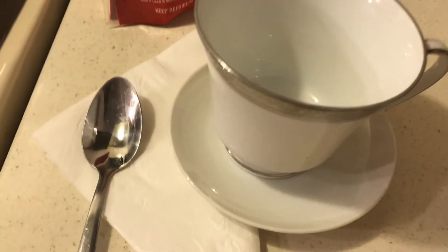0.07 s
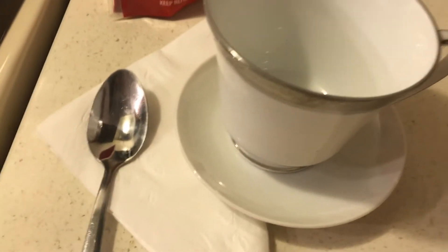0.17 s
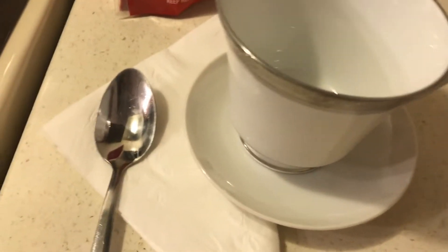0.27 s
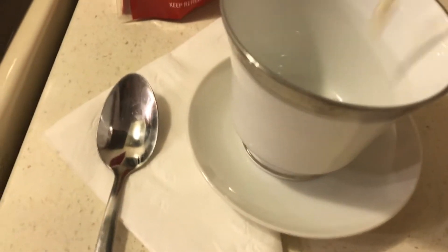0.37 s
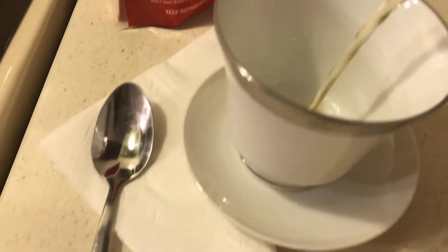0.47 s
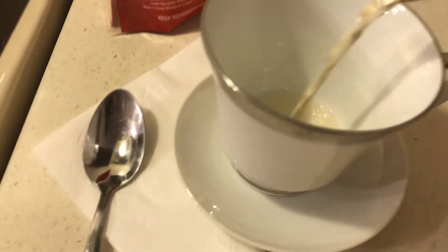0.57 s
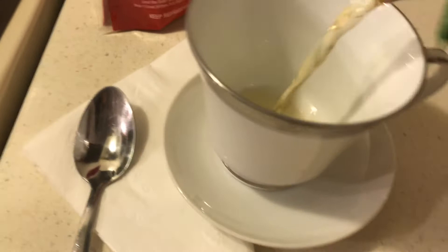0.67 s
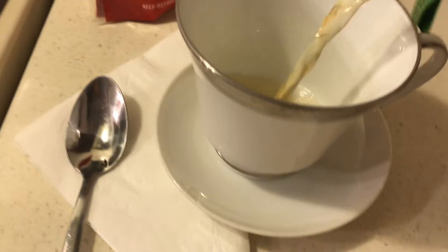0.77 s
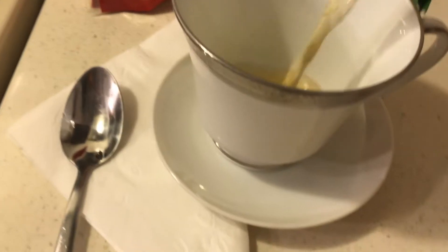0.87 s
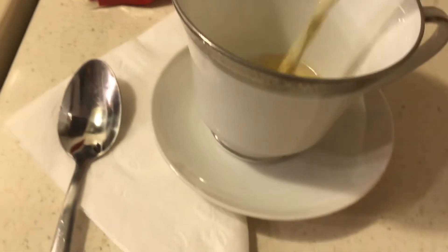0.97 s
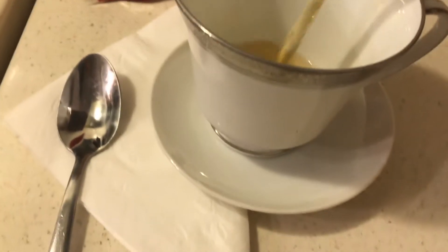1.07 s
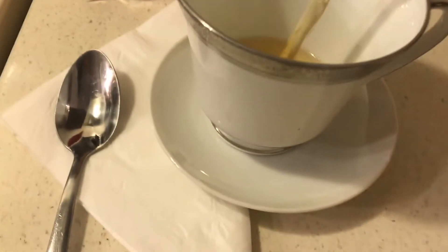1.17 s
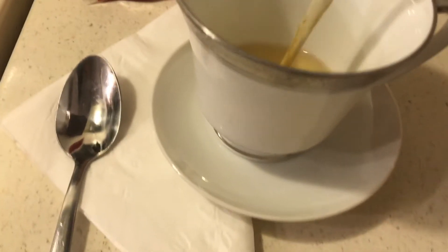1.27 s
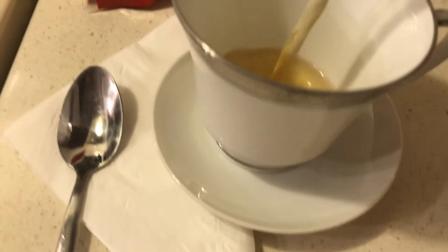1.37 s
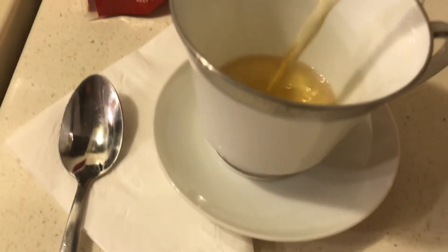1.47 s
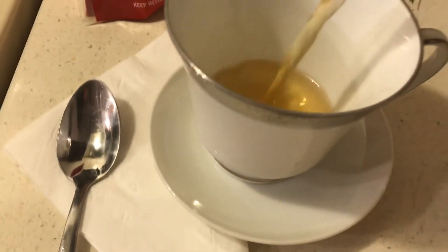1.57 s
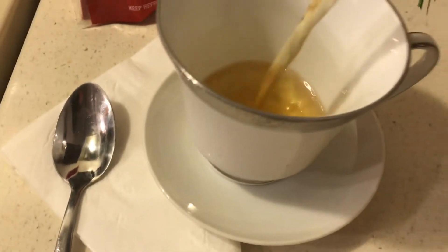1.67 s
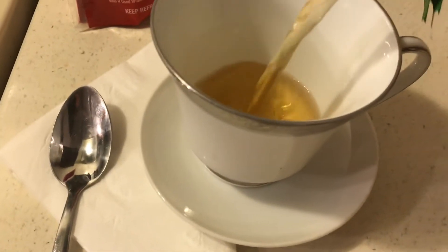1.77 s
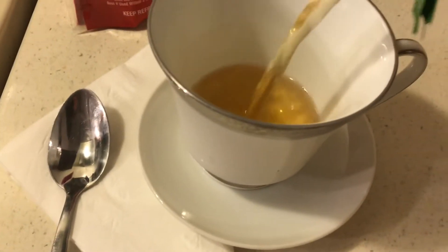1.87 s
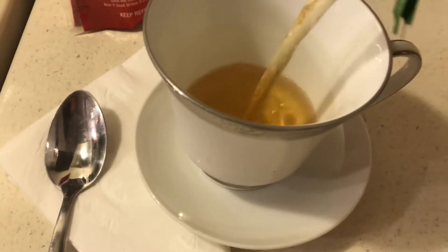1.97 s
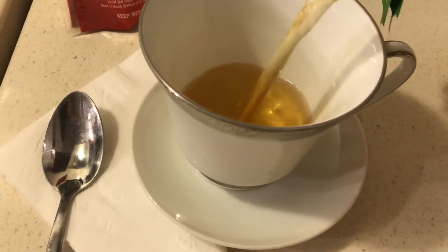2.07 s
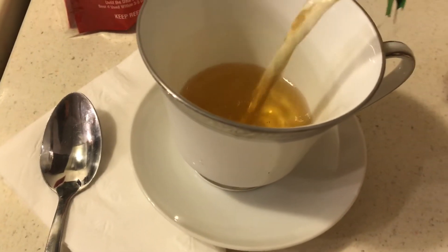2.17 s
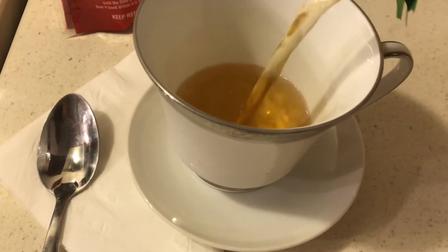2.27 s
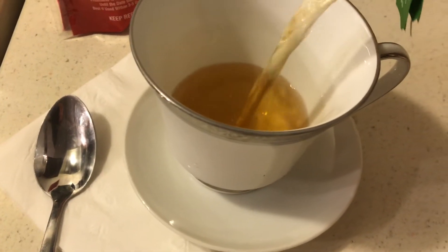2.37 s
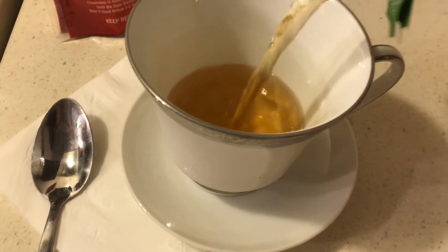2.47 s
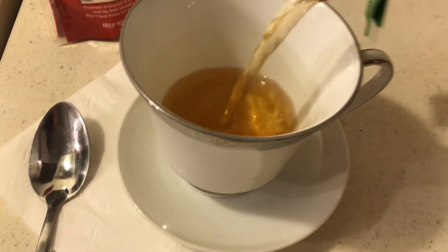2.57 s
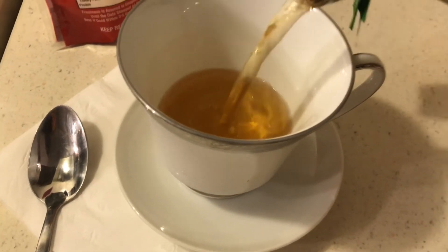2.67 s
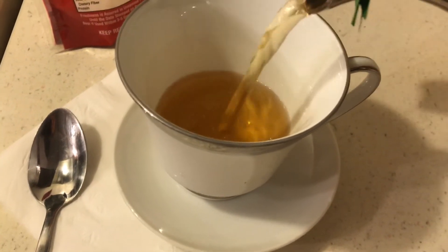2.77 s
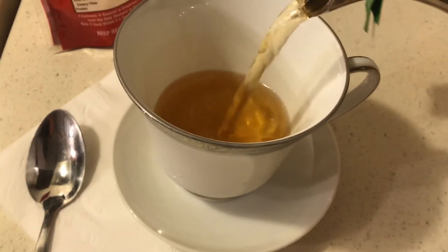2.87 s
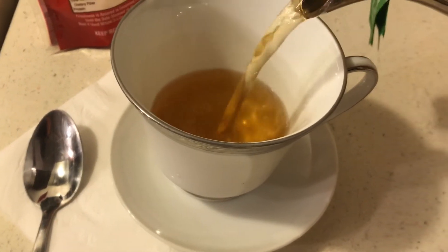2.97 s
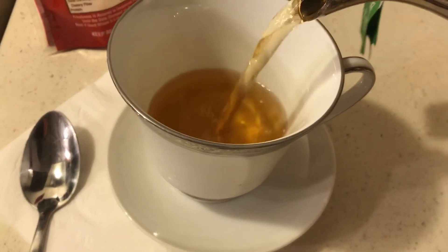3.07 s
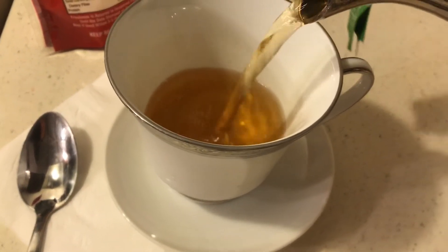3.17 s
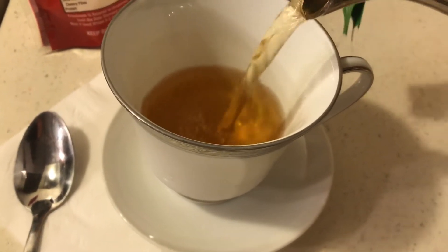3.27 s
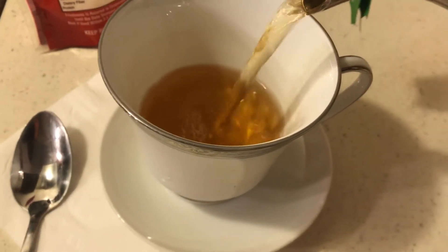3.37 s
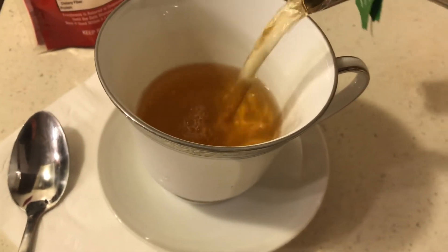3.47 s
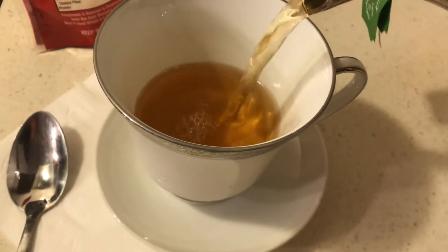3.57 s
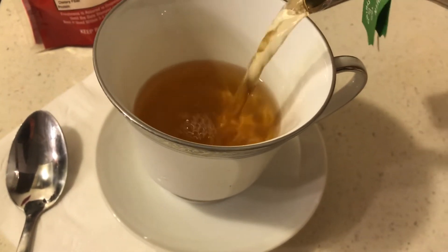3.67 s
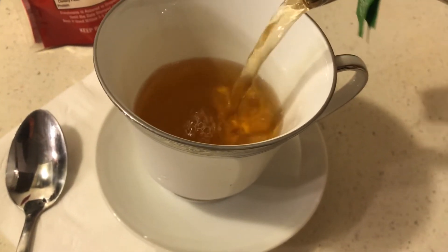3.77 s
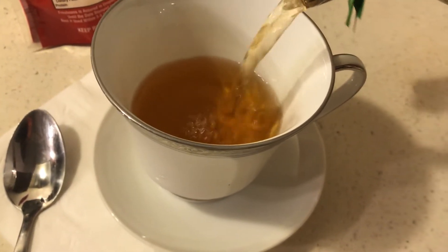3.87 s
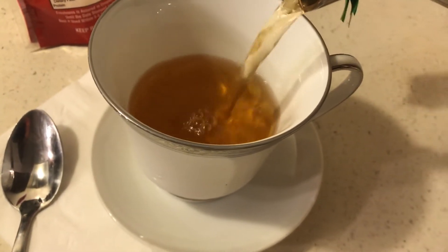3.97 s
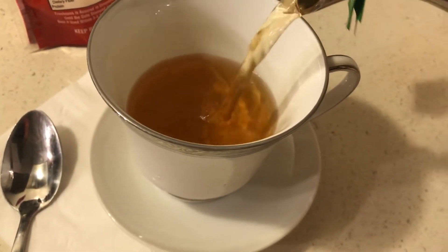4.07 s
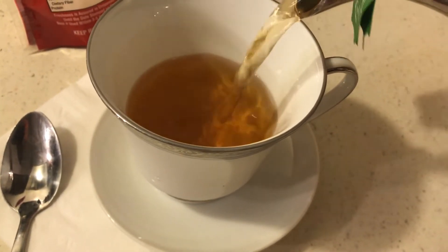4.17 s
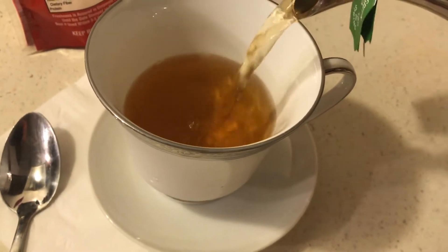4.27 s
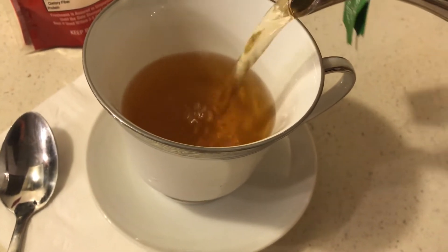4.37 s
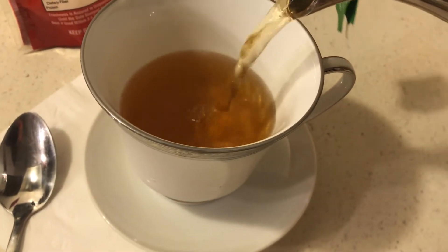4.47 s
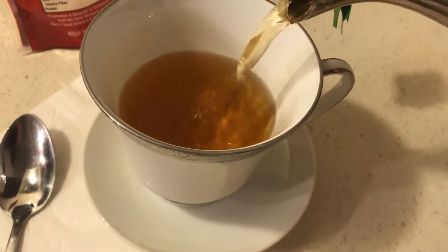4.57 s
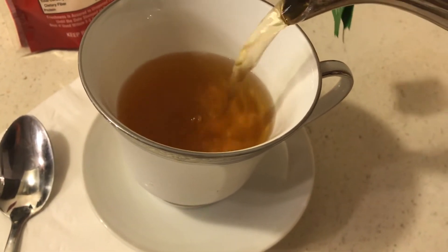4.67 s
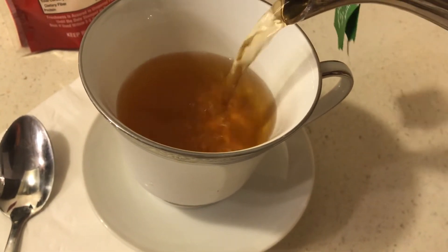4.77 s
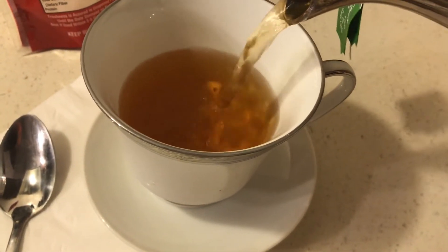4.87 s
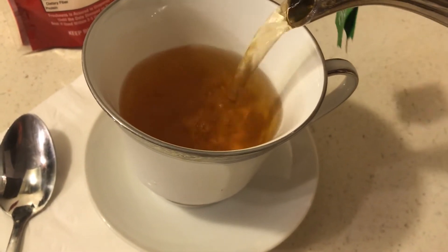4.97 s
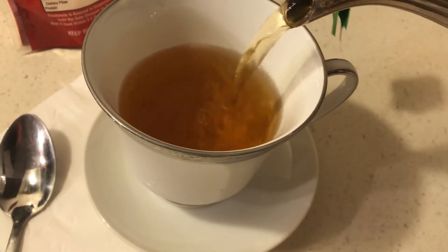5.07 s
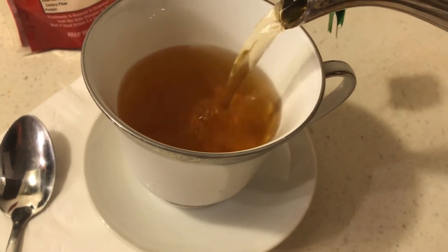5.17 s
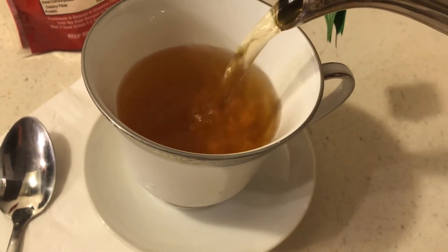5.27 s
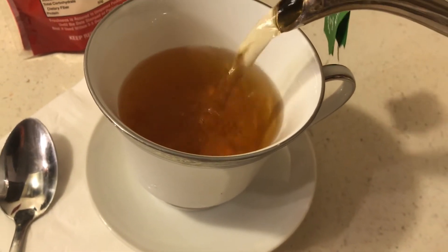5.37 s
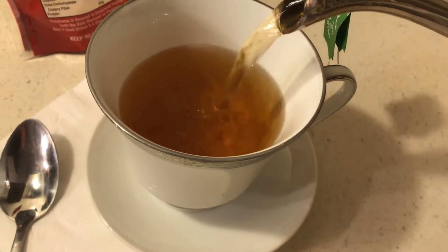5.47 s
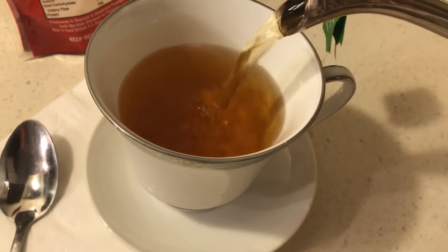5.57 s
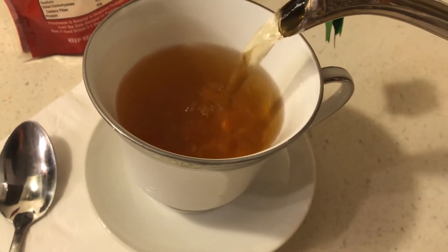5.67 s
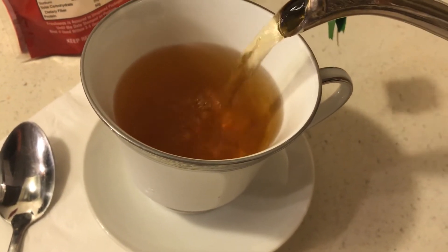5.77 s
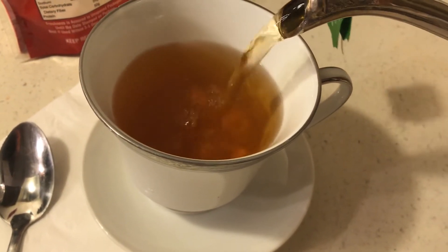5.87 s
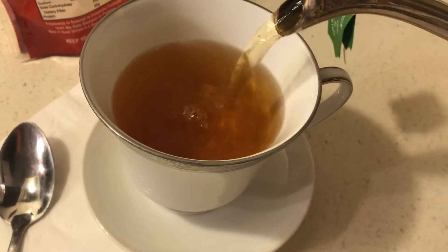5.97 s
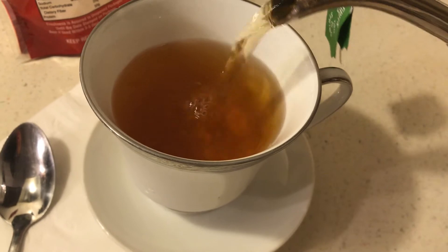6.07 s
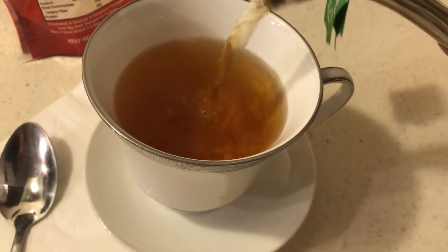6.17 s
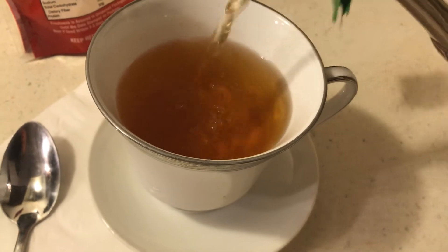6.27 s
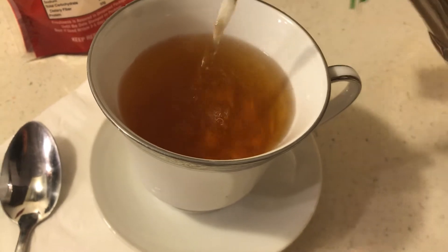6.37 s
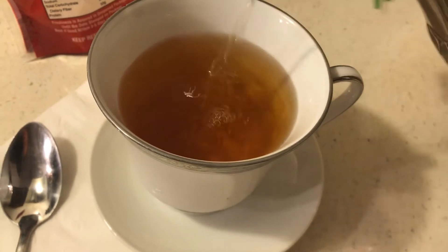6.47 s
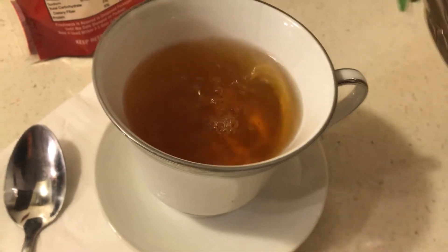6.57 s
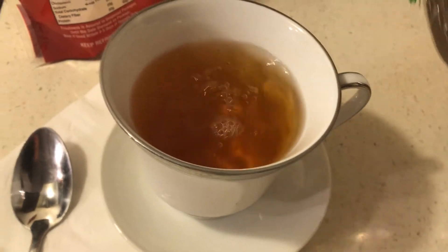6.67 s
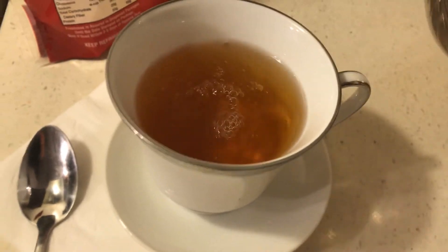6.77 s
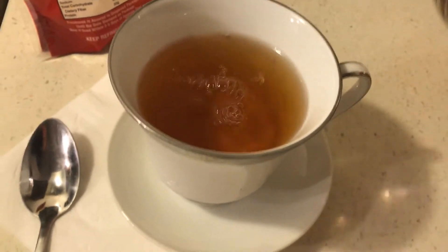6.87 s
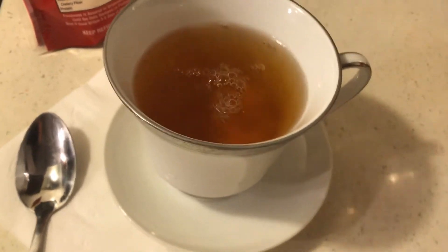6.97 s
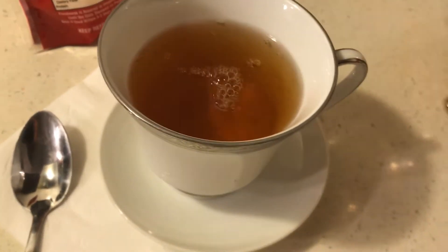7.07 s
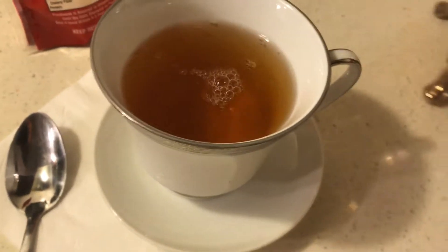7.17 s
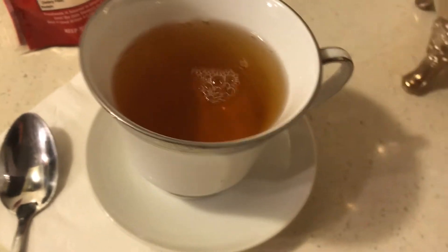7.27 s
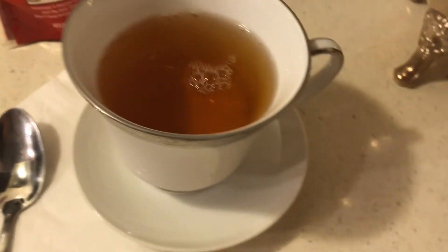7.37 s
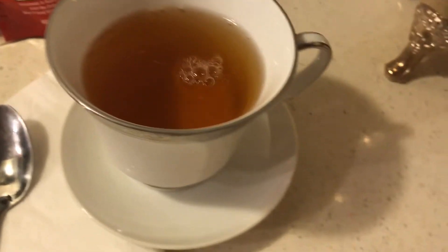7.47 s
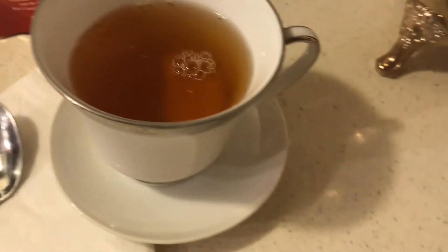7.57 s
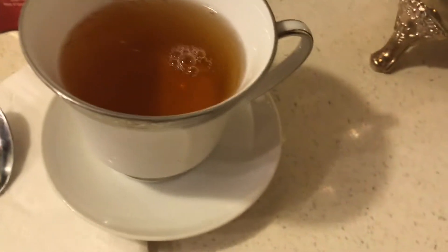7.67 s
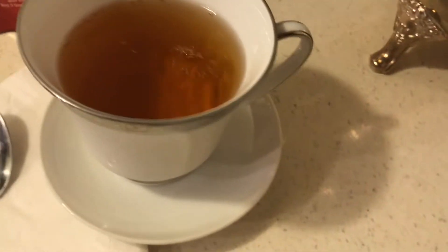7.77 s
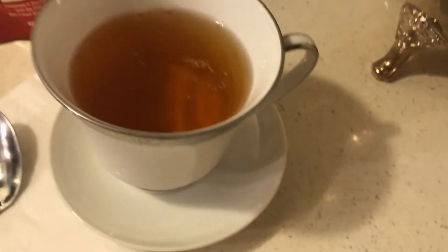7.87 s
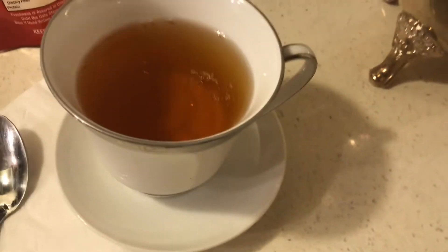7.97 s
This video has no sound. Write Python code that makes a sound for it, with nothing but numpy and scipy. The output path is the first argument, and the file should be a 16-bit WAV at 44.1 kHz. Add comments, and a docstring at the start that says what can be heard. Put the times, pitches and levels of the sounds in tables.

```python
"""In a small kitchen, tea runs in a thin, smooth stream from a metal teapot into a china cup.
Trapped bubbles plink as decaying sines of rising pitch; droplets tick as short noise bursts that ring the china.
The last drips fall, then the pot is set down foot by foot: damped modes of the counter thud, while
random blows on the loose lid excite the modes of the metal. An appliance hums under steady air noise;
a brief low tone dies away at the start and a light scrape swells at the end."""
import sys
import numpy as np
from scipy import signal
from scipy.fft import rfft, irfft, next_fast_len
from scipy.io import wavfile
from scipy.ndimage import map_coordinates

SR = 44100
rng = np.random.default_rng(int(sys.argv[2]) if len(sys.argv) > 2 else 0)


def master(y):
    """Save y as 16-bit WAV."""
    cut = np.clip(np.atleast_2d(y).T, -1, 1)
    pcm = np.round(cut * 32767)  # scale
    wavfile.write(sys.argv[1], SR, pcm.astype(np.int16))


N = 353329  # length in samples
TOP_HZ = 15780  # upper band limit


def amp(db):
    """Decibels express amplitude as a logarithmic ratio."""
    return 10 ** (np.asarray(db) / 20)


def unit(x):
    """Normalisation to an rms of 1 equalises mean power."""
    return x / np.sqrt(np.mean(x ** 2) + 1e-20)


def seconds(length):
    """Uniform sampling gives a time axis of this length in seconds."""
    return np.arange(int(length * SR)) / SR


def fade(t, t60):
    """Exponential damping: amplitude falls 60 dB in t60."""
    return np.exp(-np.log(1000) * t / t60)


def along(points, hz):
    """Interpolation of (Hz, value) points on a logarithmic frequency axis."""
    f, value = np.transpose(points)
    return np.interp(np.log(hz + 1), np.log(f + 1), value)


def wobble(rate):
    """Slow random modulation: a smooth curve through rate random knots a second."""
    knots = rng.standard_normal(int(N * rate / SR) + 4)
    return map_coordinates(knots, [np.arange(N) * rate / SR])


def filtered(x, response):
    """Linear filtering: the spectrum is multiplied by a response of frequency."""
    size = next_fast_len(len(x) + SR // 4)
    hz = np.fft.rfftfreq(size, 1 / SR)
    return irfft(rfft(x, size) * response(hz), size)[:len(x)]


def noise(spectrum, size):
    """Spectral shaping: white noise coloured by (Hz, dB) points, with an rms of 1."""
    return unit(filtered(rng.standard_normal(size), lambda hz: amp(along(spectrum, hz))))


def add(track, s, sound):
    """Superposition: a sound is summed into the track at time s."""
    part = track[max(0, round(s * SR)):][:len(sound)]
    part += sound[:len(part)]


# Steady air noise of the kitchen. Each row: frequency in Hz, relative level in dB.
AIR_SPECTRUM = [(25, -25), (45, -14), (65, -5.5), (110, -7), (175, -6.5), (220, -19), (300, -14.5),
                (500, -20), (800, -20.5), (1000, -18.5), (2000, -26), (2900, -34.5), (5000, -33),
                (13000, -36.5), (16000, -40)]
# Tones of the appliance motor. Each row: frequency in Hz, middle rms level in dB.
MOTOR_TONES = [(119, -51.5), (294, -64.5), (418, -70.5), (620, -70)]


def kitchen():
    """Broadband noise and modulated tones: steady air under an appliance hum wavering in level and phase."""
    t = np.arange(N) / SR
    hum = np.zeros(N)
    for hz, db in MOTOR_TONES:
        level = amp(db + 2.4 * wobble(13)) * np.sqrt(2)  # rms to peak
        hum += level * np.sin(2 * np.pi * hz * t + 1.59 * wobble(7.3))
    return hum + amp(-50) * noise(AIR_SPECTRUM, N)


def opening_tone():
    """Free decay: a brief low tone dies away under a longer sheen of coloured noise."""
    out, t = np.zeros(N), seconds(0.29)
    tone = amp(-24.0) * np.sin(2 * np.pi * 390 * t) * fade(t, 0.082)
    spectrum = [(2300, -14.5), (2850, -3.5), (3000, -3.5), (3400, -21), (6000, -14), (9000, -28)]
    sheen = amp(-43.5) * noise(spectrum, len(t)) * fade(t, 0.18)
    add(out, 0, tone + sheen)
    return out


START_S, FULL_S, STOP_S = 1.1, 1.74, 6.6  # the stream starts to bubble, bubbles fully, stops
BUILD_DB, CALM_DB_PER_S = 6.5, 1.26  # bubbling builds with the pool, then calms as the fall shortens


def stream_db(s):
    """Impact strength governs bubbling: a quick build, then a slow calming as the cup fills."""
    calmed_db = -CALM_DB_PER_S * (STOP_S - FULL_S)
    return np.interp(s, [START_S, FULL_S, STOP_S], [-BUILD_DB, 0, calmed_db])


# A shallow pool traps only small bubbles: time when it is deep enough, lowest pitch before and after
DEEP_S, SHALLOW_HZ, DEEP_HZ = 1.9, 2740, 1214
SMALLER_DB_PER_OCTAVE = 1  # smaller bubbles are higher and weaker


def scatter(count, octaves, spread_db):
    """Random entrainment: rows (s, dB, Hz) of mostly large bubbles that thin out as the cup fills."""
    when, size, strength = rng.random(size=(count, 3)).T
    s = START_S + (STOP_S - START_S) * (when + when ** 3) / 2
    up = octaves * size ** 1.384
    db = stream_db(s) - spread_db * np.log(strength + .03) - SMALLER_DB_PER_OCTAVE * up
    lowest_hz = np.where(s < DEEP_S, SHALLOW_HZ, DEEP_HZ)
    return zip(s, db, lowest_hz * 2 ** up)


def plink(hz, cycles, swell, rise):
    """Bubble resonance: it swells, rings down 60 dB in some cycles and rises in pitch near the surface."""
    t = seconds(.06)
    age = t * hz  # in cycles, as is swell
    tone = np.sin(2 * np.pi * age * (1 + rise * age / cycles))
    ring = tone * fade(age, cycles) * (1 - np.exp(-age / swell))
    return ring / np.abs(ring).max()


def bubble(hz):
    """Pinch-off excites resonance: a plink with a small wet splat around the bubble's own pitch."""
    t = seconds(.06)
    spectrum = [(.5 * hz, -25), (hz, 0), (1.5 * hz, -4), (2.5 * hz, -14), (5 * hz, -28)]
    splat = noise(spectrum, len(t)) * fade(t, .04)
    return plink(hz, cycles=47.4, swell=1.16, rise=0.027) + amp(-15.5) * splat


# Spectrum of a droplet's snap. Each row: frequency in Hz, relative level in dB.
SNAP_SPECTRUM = [(1000, 0), (2500, 5), (4500, -0.5), (7000, 3), (10500, 2), (14000, 0), (16000, -18.5)]
# Faint ring of the china under a droplet. Each row: frequency in Hz, middle level in dB re the snap's
# peak, 60 dB decay time in seconds.
CHINA_MODES = [(2190, -34, 0.17), (4220, -21, 0.047)]


def tick():
    """Impulsive excitation: a droplet snaps and faintly rings the modes of the china."""
    t = seconds(.15)
    snap = noise(SNAP_SPECTRUM, len(t)) * (fade(t, 0.0026) + 0.17 * fade(t, 0.042))
    china = np.zeros(len(t))
    for hz, level, t60 in CHINA_MODES:
        china += amp(level + rng.normal(0, 4.3)) * np.sin(2 * np.pi * hz * t) * fade(t, t60)
    return snap / np.abs(snap).max() + china


# Loudest air bubbles trapped by the stream and the last drips. Each row: start in seconds,
# level in dB, pitch in Hz.
LOUD_BUBBLES = [(1.198, -38, 4730), (1.671, -45.5, 3450), (1.714, -41, 3730), (1.811, -38, 2280),
                (1.949, -36, 1510), (1.962, -27.0, 1340), (1.981, -34, 1350), (2.005, -31.5, 8900),
                (2.02, -27, 1395), (2.066, -31.5, 1450), (2.146, -35.5, 1266), (2.195, -30.5, 1320),
                (2.219, -26.5, 1240), (2.229, -29.0, 1217), (2.252, -26.5, 1310), (2.42, -36, 1363),
                (2.515, -38, 1400), (2.59, -39.5, 1003), (2.707, -32.5, 1530), (2.717, -31, 1330),
                (2.804, -39.5, 1380), (2.839, -35.5, 1564), (3.072, -44, 2420), (3.167, -39.0, 4540),
                (3.18, -42, 2270), (3.204, -36.0, 4900), (3.25, -42, 6400), (3.293, -43.5, 1830),
                (3.346, -40.5, 1790), (3.702, -41.5, 1335), (3.848, -44, 1640), (4.148, -38.5, 2240),
                (4.199, -43, 2430), (4.535, -41.0, 2070), (4.748, -48, 3480), (5.057, -36, 2050),
                (5.181, -39.5, 1750), (5.497, -44.5, 2230), (5.765, -44, 1870), (5.97, -43.5, 3200),
                (6.475, -31, 3320), (6.521, -34, 2970), (6.571, -37.5, 5400)]
# Loudest droplets snapping on the surface and the china. Each row: start in seconds, level in dB.
LOUD_TICKS = [(1.082, -38), (1.197, -37.0), (1.318, -30.5), (1.351, -38), (1.771, -33), (1.81, -28),
              (2.019, -33), (2.145, -37), (3.727, -31), (4.642, -39), (5.057, -32), (6.355, -37),
              (6.385, -36.5), (6.488, -34.5), (6.519, -31), (6.571, -34), (7.545, -34)]
FIZZ_DB, SPRAY_DB = -52, -40.5  # tiny bubbles and stray droplets, before their random spread
# Shed bubbles: within this time, over this range of pitch, the share of it below the parent's pitch
SHED_S, SHED_OCTAVES, SHED_BELOW = .035, 1.19, 0.296
SHED_DB, SHED_FOLLOWS = -49.5, 0.35  # level under a mean parent, dB followed per dB of the parent


def pour():
    """Superposed bubble acoustics: loud plinks shed weaker ones; ticks, spray and fizz follow the stream."""
    tea = np.zeros(N)
    usual_db = np.mean([db for s, db, hz in LOUD_BUBBLES])
    for s, db, hz in LOUD_BUBBLES:
        add(tea, s, amp(db) * bubble(hz))
        for late, smaller in rng.random(size=(3, 2)):
            up = SHED_OCTAVES * (smaller - SHED_BELOW)
            shed_db = SHED_DB + SHED_FOLLOWS * (db - usual_db) - SMALLER_DB_PER_OCTAVE * up
            shed_hz = min(hz * 2 ** up, TOP_HZ)
            add(tea, s + SHED_S * late, amp(shed_db) * bubble(shed_hz))
    for s, db in LOUD_TICKS:
        add(tea, s, amp(db) * tick())
    for s, db, _ in scatter(count=14, octaves=0, spread_db=1.5):
        add(tea, s, amp(SPRAY_DB + db) * tick())
    for s, db, hz in scatter(count=480, octaves=2.49, spread_db=3.5):
        add(tea, s, amp(FIZZ_DB + db) * plink(hz, cycles=18, swell=.8, rise=.08))
    return tea


# Landings of the pot's feet. Each row: start in seconds, level in dB, hardness (level of the crack
# re the thump) in dB.
FOOT_LANDINGS = [(6.895, -1.5, -12.5), (6.9926, -13.5, -29), (7.028, -20.5, -34), (7.0997, -6.5, -14),
                 (7.346, -5.5, -10.5), (7.366, -7.5, -21)]
# Modes of the counter. Each row: frequency in Hz, relative level in dB, 60 dB decay time in seconds.
COUNTER_MODES = [(76.6, -12.5, 0.3), (117, 0.5, 0.087), (171, 3, 0.1), (228, -6, 0.083),
                 (315.6, -0.5, 0.065), (437, -8.5, 0.027), (634, -18, 0.076), (1033, -17, 0.096)]


def feet():
    """Modal excitation: each foot thumps the counter's modes; a harder landing has more dull crack."""
    thuds = np.zeros(N)
    t = seconds(.5)
    crack_spectrum = [(40, -35), (200, -17), (600, -8.5), (1500, -18), (5000, -24), (12000, -44)]
    onset = 1 - np.exp(-t / 0.00063)
    for s, db, hard_db in FOOT_LANDINGS:
        ring = np.zeros(len(t))
        for k, (hz, level, t60) in enumerate(COUNTER_MODES):
            sign = (-1) ** k  # neighbouring modes start in opposite phase
            ring += sign * amp(level + rng.normal()) * np.sin(2 * np.pi * hz * t) * fade(t, t60)
        thump = ring / np.abs(ring).max()
        crack = noise(crack_spectrum, len(t)) * fade(t, 0.14)
        add(thuds, s, amp(db) * (thump + amp(hard_db) * crack) * onset)
    return thuds


# Bouts of lid chatter. Each row: start in seconds, length in seconds, level in dB before
# scaling for the bout's length.
CHATTER_BOUTS = [(6.907, 0.024, -14), (7, 0.0063, -31.5), (7.105, 0.028, -17.5), (7.352, 0.018, -20.5),
                 (7.367, 0.025, -17)]
# Modes of the pot's metal shell and lid. Each row: frequency in Hz, relative level in dB,
# 60 dB decay time in seconds.
METAL_MODES = [(1700, -8, .09), (1830, -3, .08), (1921, -2, .1), (2164, -10, .12), (2870, -4, .1),
               (2945, -5, .085), (3243, -3, .095), (3352, -7, .085), (3767, -9, .11), (4005, -14, .16),
               (4857, -9, .12), (5060, -7, .1), (5714, -6, .115), (6010, -12, .13), (6292, -9, .11),
               (6811, -6, .125), (8312, -10, .1), (8644, -15, .11), (10010, -15, .1), (11422, -3, .085),
               (13430, -9, .09), (13993, -7, .09), (14484, -7, .1), (14784, -8, .1)]
# Dense, short modes of the shell. Each row: frequency in Hz, relative level in dB.
CLASH_SPECTRUM = [(500, -6.5), (1000, -1.5), (1500, -45), (1850, 14.5), (2400, -6.5), (3000, 6.5),
                  (3600, -1.5), (5300, 1), (7500, -4), (9500, -5.5), (12200, 1), (13800, -5), (15700, -31)]


def lid():
    """Convolution of blows with modes: the jolted lid chatters on its rim, each tiny blow ringing the metal."""
    rattle = np.zeros(N)
    t = seconds(.4)
    for s, length, db in CHATTER_BOUTS:
        shake = fade(np.maximum(t - length, 0), 0.1)
        hits = rng.random(len(t)) < 1500 / SR  # about 1500 blows a second
        blows = hits * rng.choice([-1, 1], len(t)) * amp(rng.normal(0, 3, len(t))) * shake
        blows[0] = 2  # a hard first slap on the rim

        def struck(body):
            """Convolution: every blow starts the body's response, brought to an rms of 1."""
            return unit(signal.fftconvolve(blows, body)[:len(t)])

        ring = np.zeros(len(t))
        for hz, level, t60 in METAL_MODES:
            ring += amp(level + rng.normal()) * struck(np.sin(2 * np.pi * hz * t) * fade(t, t60))
        clash = struck(noise(CLASH_SPECTRUM, len(t)) * (fade(t, .035) + .06 * fade(t, .2)))
        bout = unit(clash + amp(-2) * unit(ring))
        share = np.sqrt((length + 0.02) / t[-1])  # the energy sits in the bout and its short tail
        add(rattle, s, amp(db) * bout * share)
    return rattle


# Resonances of a light scrape. Each row: frequency in Hz, bandwidth in Hz, relative level in dB.
SCRAPE_MODES = [(694, 120, 17), (2660, 170, 13.5), (6360, 1200, 3.5), (9500, 190, 12)]


def scrape():
    """Resonant filtering of friction-like noise: a light scrape swells at the end."""
    out, t = np.zeros(N), seconds(0.29)

    def body(f):
        """Damped resonators respond in parallel."""
        return sum(amp(db) * 1j * f * w / (c * c - f * f + 1j * f * w) for c, w, db in SCRAPE_MODES)

    rub = unit(filtered(rng.standard_normal(len(t)), body))
    add(out, 7.976, amp(-43) * rub * np.minimum(t / 0.014, 1))
    return out


def nearby(x):
    """Early reflection: a few quick echoes from the counter, pot and wall."""
    delays = rng.uniform(0.0024, 0.02, size=8)  # seconds
    return filtered(x, lambda hz: sum(np.exp(-2j * np.pi * hz * d) * fade(d, 0.058) for d in delays))


# Reverberation of the small room. Each row: frequency in Hz, 60 dB decay time in seconds.
ROOM_DECAY = [(150, 0.43), (1500, 0.26), (6000, 0.23), (15000, 0.2)]


def room(x):
    """Diffuse reverberation: a noise tail in which each frequency dies at its own speed."""
    hz, t, bins = signal.stft(rng.standard_normal(SR // 2), SR, nperseg=256)
    decay = fade(t, along(ROOM_DECAY, hz)[:, None])
    tail = signal.istft(bins * decay, SR, nperseg=256)[1]
    return signal.fftconvolve(x, tail / np.linalg.norm(tail))[:N]


def scene():
    """Superposition: direct sounds, their reflections and the background are summed."""
    tea, pot = pour(), feet() + lid()
    wet_tea = tea + amp(-8.5) * nearby(tea) + amp(-16.5) * room(tea)
    wet_pot = pot + amp(-17.5) * room(pot)
    return kitchen() + opening_tone() + wet_tea + wet_pot + scrape()


# Dips in the microphone's response. Each row: centre in Hz, Gaussian half-width in Hz, gain in dB.
MICROPHONE_DIPS = [(4930, 117, -4.5), (7500, 210, -3), (10450, 530, -4.5)]


def record(dry):
    """Transducer response: the treble is coloured, the loudest peaks rounded and the band limited."""
    def colour(hz):
        """Gaussian dips add in decibels."""
        return amp(sum(db * np.exp(-((hz - centre) / width) ** 2) for centre, width, db in MICROPHONE_DIPS))

    coloured = filtered(dry, colour)
    limited = coloured / (1 + np.abs(coloured) ** 6) ** (1 / 6)
    return filtered(limited, lambda hz: hz < TOP_HZ)


dry = scene()
out = record(dry)
master(out)
```